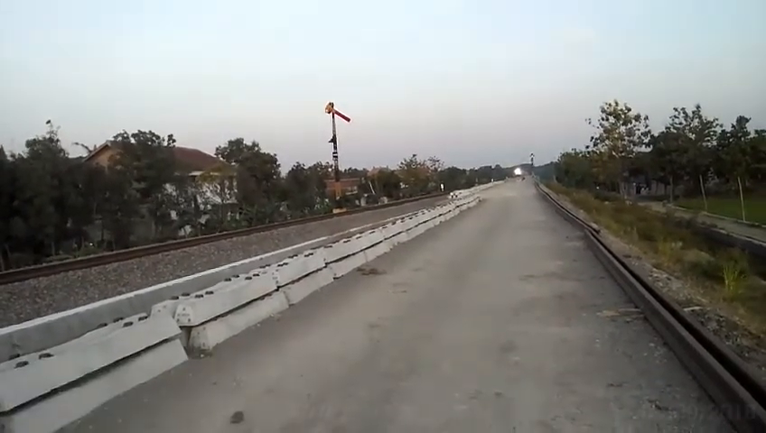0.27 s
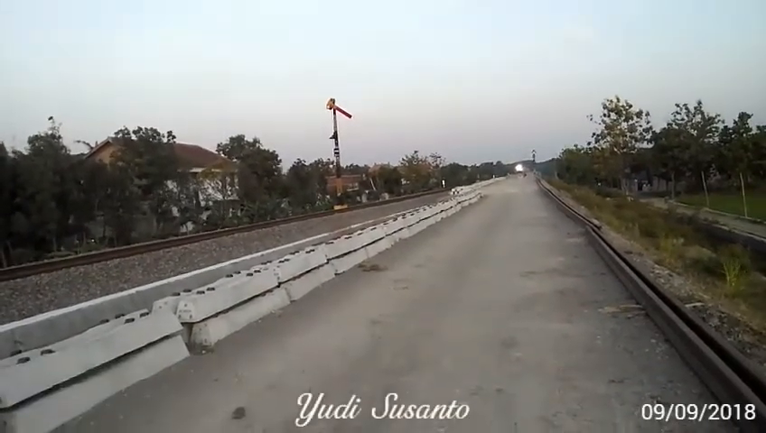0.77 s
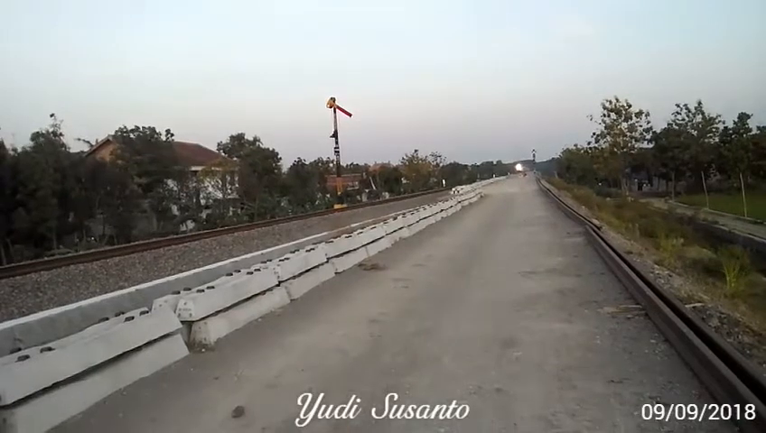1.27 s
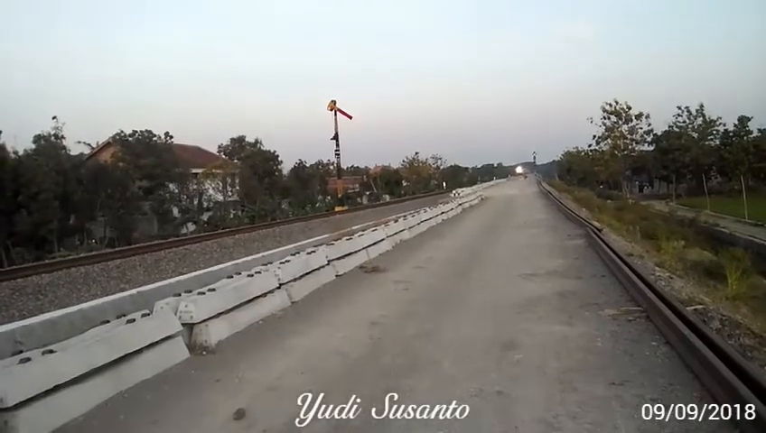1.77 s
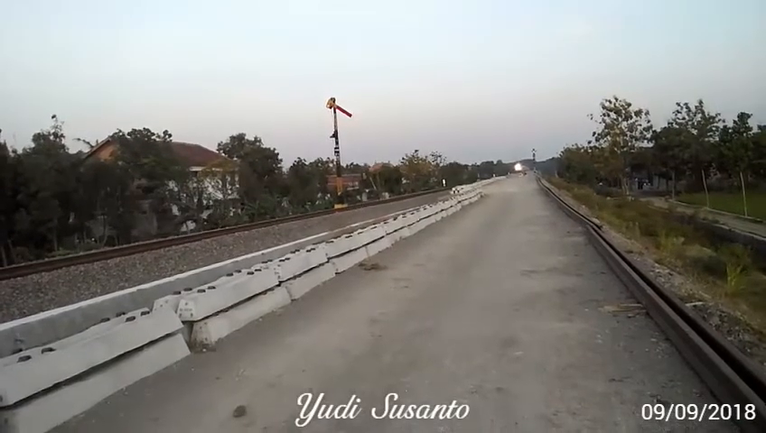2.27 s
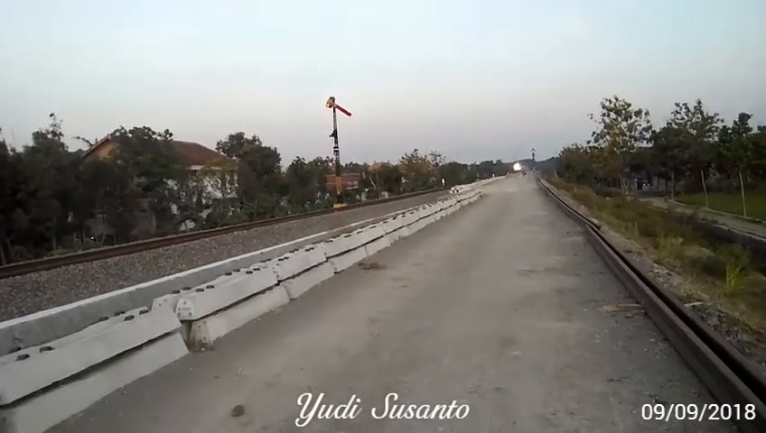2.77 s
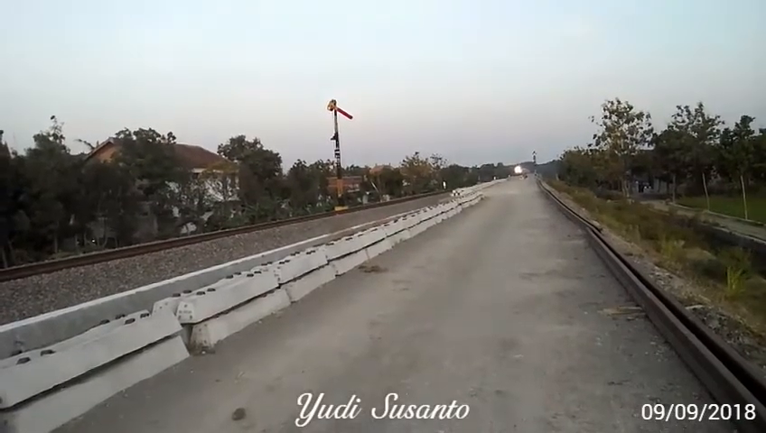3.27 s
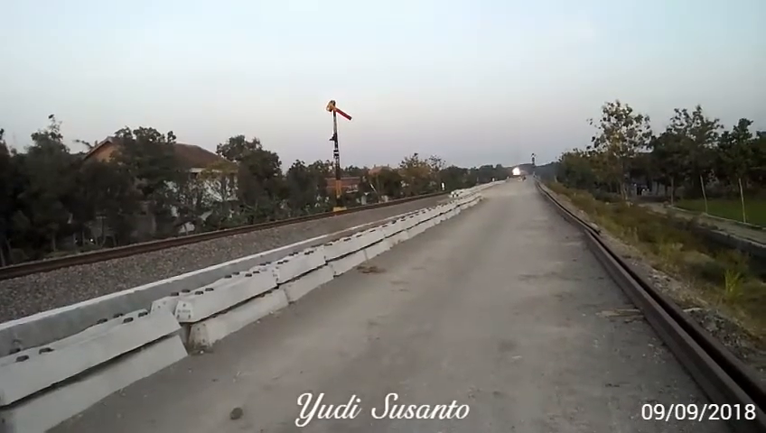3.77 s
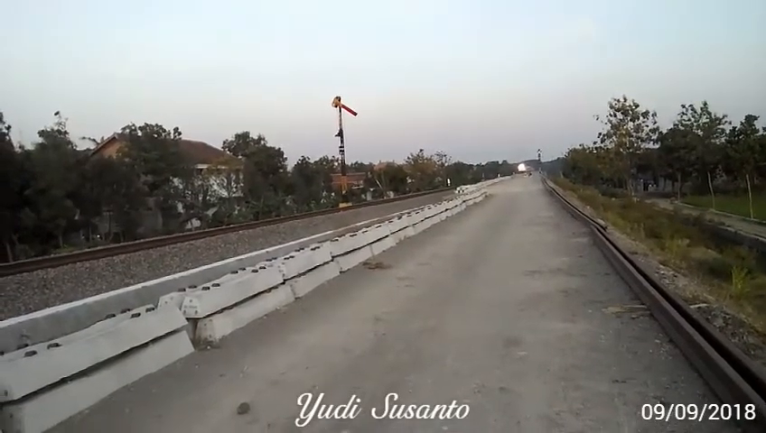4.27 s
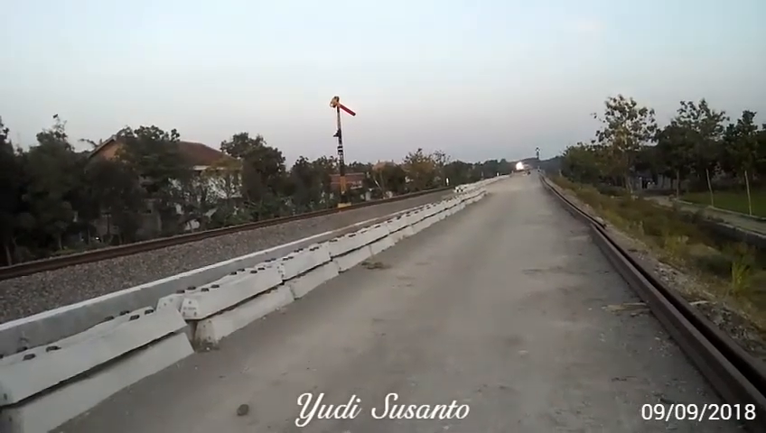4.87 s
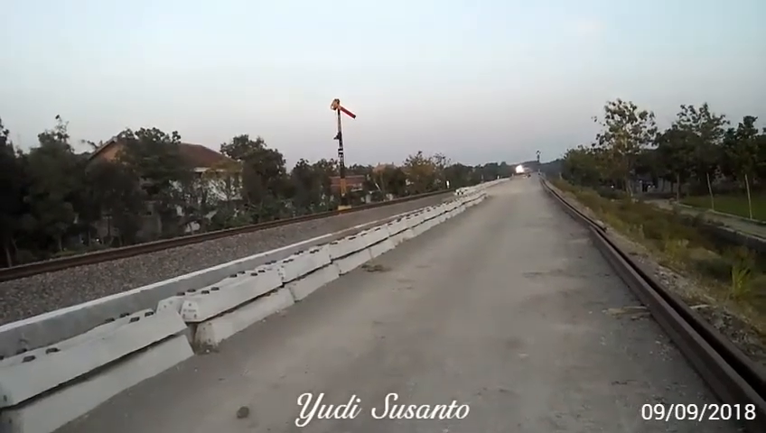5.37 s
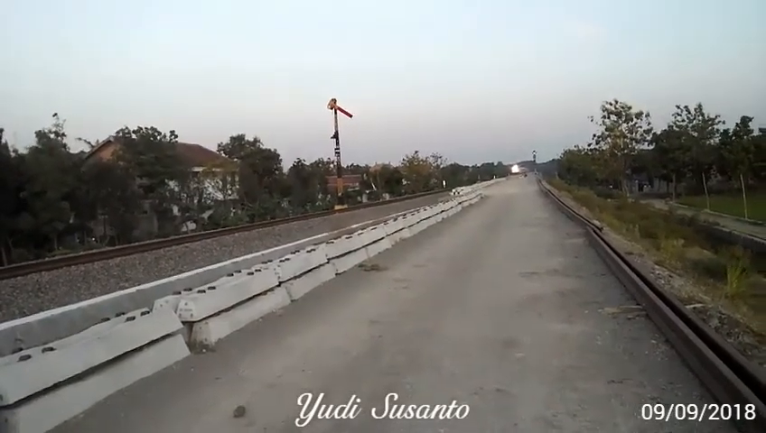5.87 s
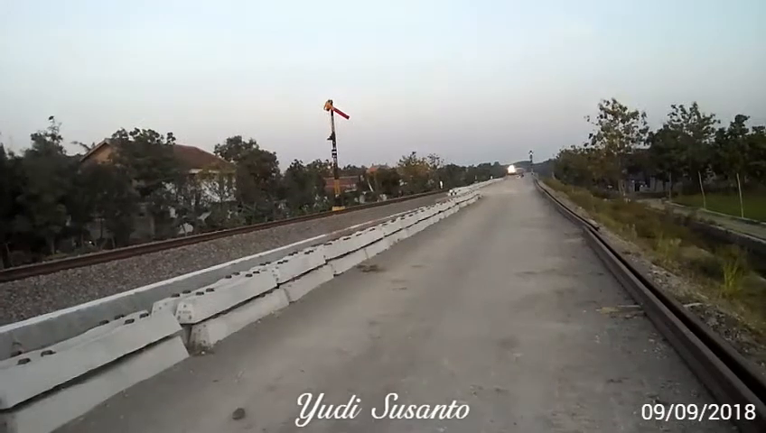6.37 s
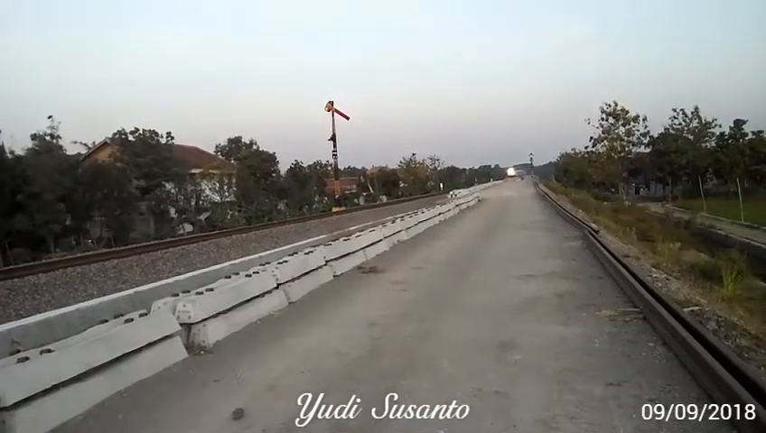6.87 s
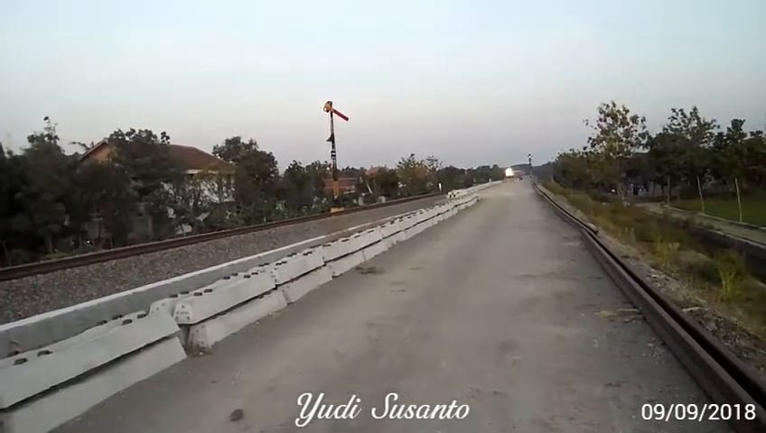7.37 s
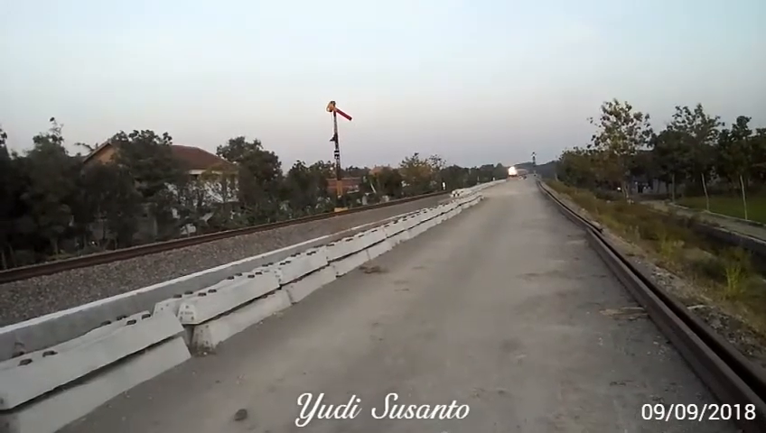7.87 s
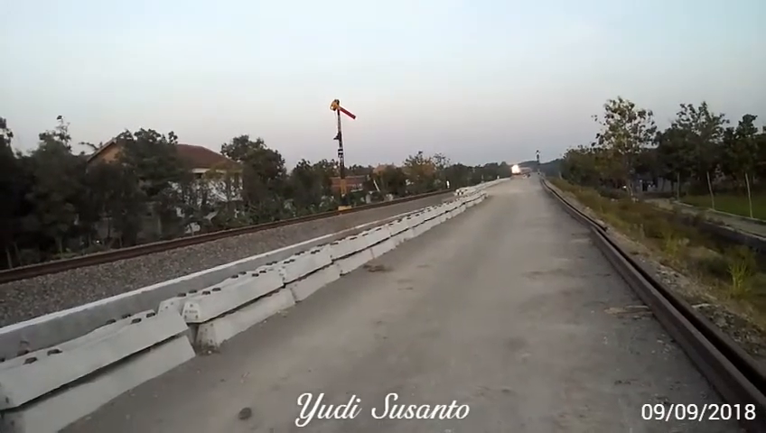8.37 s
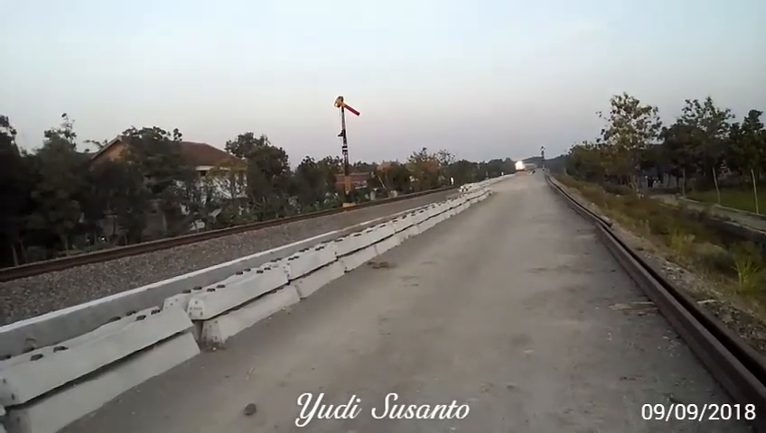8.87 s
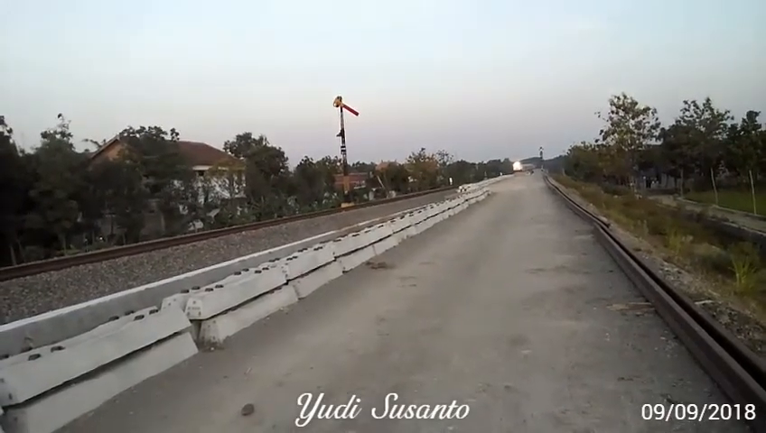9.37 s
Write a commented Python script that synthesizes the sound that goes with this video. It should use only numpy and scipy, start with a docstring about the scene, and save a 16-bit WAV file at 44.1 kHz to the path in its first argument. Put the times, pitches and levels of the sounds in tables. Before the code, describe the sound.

Mono outdoor sound beside a railway line, about 9.6 seconds. Throughout, a distant diesel locomotive gives a low, rough, wavering drone with a rapid throb, under a dull roar, soft rushing and very faint hiss that drift with the air. At first the wind is light, with small bumps from 0.2 to 1.2 s. From 1.6 to 3 s gusts hit the microphone in close, muffled fluttering thumps; at about 2.6 s a tiny dry triple-contact tick sounds nearby. It calms around 3 to 4.3 s, leaving the drone exposed. Thumps return at 4.3-4.9 s, then a denser, stronger run from 5.5 to 7.4 s, hardest near 6.7 s, with a very brief dip in the airy rushing around 7.15 s. Scattered weaker bumps follow near 8, 8.5 and 9 s. The engine grows slightly brighter towards the end, the rushing a little clearer, but it stays far away.

```python
"""Gusts of wind buffet a small microphone in open country beside a railway line; far down the track
a diesel locomotive drones, throbs and brightens as it approaches, and once something ticks close by.
The wind is shaped noise that swells in gusts, with short pressure swings for single eddies.
The locomotive is a set of crankshaft harmonics plus noise modulated four times a turn.
A dull roar, a rushing and a faint hiss are noise bands that swell and flicker; the tick is three bursts."""
import sys
import numpy as np
from scipy import signal
from scipy.fft import rfft, irfft, next_fast_len
from scipy.io import wavfile
from scipy.ndimage import map_coordinates

SR = 44100
rng = np.random.default_rng(int(sys.argv[2]) if len(sys.argv) > 2 else 0)


def dump_mix(stems):
    """Bounce the given channels to the path in sys.argv[1] as a 16-bit WAV at rate SR."""
    frames = np.atleast_2d(stems).T  # one column per channel
    limited = np.clip(frames, -1, 1)  # hard clip at full scale
    pcm = np.round(limited * 32767).astype(np.int16)
    wavfile.write(sys.argv[1], SR, pcm)


N = 424683  # length in samples

# Spectrum shape of wind noise at the microphone: [frequency_hz, relative_density_db]
WIND_SPECTRUM = [(20, -37.5), (35, -29.5), (65, -16), (110, -6.5), (180, -0.5), (310, 1.5), (440, -1.5),
                 (600, -6), (850, -15.5), (1200, -30.5), (1800, -45.5), (3000, -66)]
# Gusts as short puffs: [crest_s, relative_turbulence_db, half_length_s, rumble_db]
GUST_PUFFS = [(0.494, -41.5, 0.017, -36), (0.551, -40, .014, -41), (0.663, -41.5, 0.015, -35),
              (0.752, -45, .03, -38), (0.968, -42.5, .03, -45.5), (1.092, -45.5, .018, -40.5),
              (1.622, -37.5, .014, -38), (1.773, -34.5, .026, -39.5), (1.849, -34, .024, -38.5),
              (2.029, -34, .013, -37), (2.077, -35.5, .015, -36), (2.16, -36.5, 0.035, -36),
              (2.292, -38, .019, -39), (2.537, -38.5, .022, -46), (2.706, -39, 0.0099, -45),
              (2.881, -42, .032, -40), (3.069, -45.5, .025, -52), (4.342, -36.5, .014, -37.5),
              (4.387, -35.5, .018, -39), (4.486, -37, .017, -36), (4.706, -36, 0.019, -39),
              (4.75, -34, .02, -41), (4.866, -43, .035, -43.5), (5.557, -38.5, .016, -41),
              (5.635, -36.5, .02, -47), (5.72, -37, .024, -42), (5.808, -34.5, .03, -36),
              (5.902, -37, 0.031, -52), (5.983, -37, .017, -46), (6.067, -34, .029, -36.5),
              (6.217, -38, .028, -40.5), (6.35, -42.5, 0.074, -49), (6.489, -39, 0.02, -41),
              (6.585, -41, 0.016, -46), (6.658, -33, .009, -41), (6.74, -30, .02, -34),
              (6.821, -36.5, 0.033, -42.5), (6.91, -38, 0.023, -47.5), (7.027, -37, .04, -40),
              (7.351, -35.5, .017, -36), (7.439, -40.5, .02, -45), (7.964, -40, .033, -40),
              (8.135, -41, 0.037, -39), (8.468, -41, .038, -36.5), (8.597, -44.5, .03, -45),
              (9.031, -42.5, 0.016, -48.5)]
GUST_FALL_RATIO = 1.3  # a gust dies away this much more slowly than it builds
EDDY_HZ = 378  # pitch of a typical thump


def from_db(db):
    """Decibels to amplitude gain: 20 dB is a factor of ten."""
    return 10 ** (np.asarray(db) / 20)


def rms_one(x):
    """Normalisation to unit root-mean-square amplitude."""
    return x / np.sqrt(np.mean(x ** 2) + 1e-20)


def in_time(rows):
    """Linear interpolation of each column of a curve, at every sample."""
    s, *columns = np.transpose(rows)
    return [np.interp(np.arange(N) / SR, s, column) for column in columns]


def drift(rate_hz):
    """Low-passed noise of unit spread: a random change about rate_hz times a second."""
    step = 40  # samples between computed values
    warm_up = 2000
    pole = np.exp(-2 * np.pi * rate_hz * step / SR)
    noise = rng.standard_normal(N // step + warm_up + 2)
    slow = signal.lfilter([1], [1, -2 * pole, pole * pole], noise)[warm_up:]
    return np.interp(np.arange(N) / step, np.arange(len(slow)), rms_one(slow))


def coloured(spectrum):
    """Spectral shaping: steady white noise weighted in frequency, rms 1."""
    hz, db = np.transpose(spectrum)
    size = next_fast_len(N)
    log_hz = np.log(np.arange(size // 2 + 1) * SR / size + 1)
    above = np.maximum(log_hz - np.log(hz[-1]), 0)
    below = np.maximum(np.log(hz[0]) - log_hz, 0)
    # outside the listed range the spectrum falls steadily, more steeply on the treble side
    gain = from_db(np.interp(log_hz, np.log(hz), db) - 50 * (above + below / 2))
    return rms_one(irfft(rfft(rng.standard_normal(size)) * gain, size)[:N])


def split(x, hz):
    """Complementary zero-phase crossover: the parts below and above hz sum to the whole."""
    low = signal.sosfiltfilt(signal.butter(2, hz, fs=SR, output="sos"), x)
    return low, x - low


def hump(s, half_length_s, fall_ratio=1):
    """Gaussian envelope of height 1 with its crest at s; half_length_s is its standard deviation."""
    age = np.arange(N) / SR - s
    length = np.where(age < 0, half_length_s, half_length_s * fall_ratio)
    return np.exp(-np.minimum((age / length) ** 2 / 2, 20))


def through_air(x, depth_db, patch_hz, rate, size=1024):
    """Selective fading: shifting air paths make narrow patches of the spectrum swell and fade; rms 1."""
    hz, s, parts = signal.stft(x, SR, nperseg=size)
    chance = rng.standard_normal((800, 200))
    places = np.meshgrid(hz / patch_hz, s * rate, indexing="ij")
    fading = map_coordinates(chance, places, mode="mirror")
    faded = signal.istft(parts * from_db(depth_db * fading), SR, nperseg=size)[1]
    return rms_one(faded[:N])


def wind_strength():
    """Power addition of incoherent flows: gusts over the breeze, as relative dB at every sample."""
    # steady breeze between gusts: [time_s, relative_turbulence_db]
    breeze = [(0, -55.5), (1.4, -55), (2.5, -47.5), (4.2, -51), (5.3, -45.5), (6.3, -43.5), (7.7, -47),
              (8.5, -47), (9.63, -53.5)]
    breeze_db, = in_time(breeze)
    power = from_db(breeze_db) ** 2
    for s, db, length, _ in GUST_PUFFS:
        power += (from_db(db) * hump(s, length, GUST_FALL_RATIO)) ** 2
    return 10 * np.log10(power)


def rumble_level(calm_db=-48.5, stretch=1.5):
    """Large eddies decay slowly: the bass of each gust outlasts its flutter; gain at every sample."""
    power = from_db(calm_db) ** 2
    for s, _, length, db in GUST_PUFFS:
        power = power + (from_db(db) * hump(s, length * stretch, GUST_FALL_RATIO)) ** 2
    return np.sqrt(power)


def turbulence(wind_db, split_hz=150, edge_hz=560, lumps_db=3.0, lump_rate=50, edge_lumps_db=4.0,
               brighten=0.16, body_db=4.5, edge_db=-2.0, bass_lumps_db=2.5, bass_lump_rate=8):
    """Turbulent pressure noise: harder lumps of air reach higher in pitch, over a heaving rumble."""
    swing_db = wind_db - np.mean(wind_db)
    bass, rest = split(coloured(WIND_SPECTRUM), split_hz)
    body, edge = split(rest, edge_hz)
    lumps = 2 * np.tanh(drift(lump_rate) / 2)  # bounded, so no lump runs away
    edge = edge * from_db(edge_db + brighten * swing_db + edge_lumps_db * lumps)
    flutter = from_db(wind_db + body_db + lumps_db * lumps) * (body + edge)
    heave = from_db(bass_lumps_db * drift(bass_lump_rate))
    return flutter + rumble_level() * heave * rms_one(bass)


def hum(crank, order=17, beat_hz=6.3, partner_db=-8.5, waver_db=0.7):
    """Beating: a line at a multiple of the crank rate, with a weaker one just above it; rms 1."""
    angle = order * crank
    partner = np.cos(angle + 2 * np.pi * beat_hz * np.arange(N) / SR)
    pair = np.cos(angle) + from_db(partner_db) * partner
    return rms_one(pair * from_db(waver_db * drift(0.82)))


def locomotive(lines_db=-1.0, chuff_db=-1.5, waver=0.3, wander=0.0015, throb=0.39, pivot_hz=260):
    """Periodic exhaust gives crank harmonics that waver in moving air; rough noise throbs four times a turn."""
    # course of the engine: [time_s, crank_turns_per_s, relative_drone_db, brightness_db_per_octave, hum_db]
    engine_course = [(0, 9.3, -36, -1.5, -48.5), (1.2, 9.13, -38.5, -1.5, -47.5),
                     (2.5, 9.14, -37.5, -5, -39.5), (3.7, 8.83, -36, -3.5, -42.5),
                     (5.2, 9, -35.5, 0.5, -45), (7.5, 9.24, -34.5, 4.5, -52), (8.5, 9.3, -36.5, 3, -46.5),
                     (9.63, 9.8, -36.5, 7.5, -54)]
    # exhaust harmonics: [multiple_of_crank_rate, relative_level_db]
    exhaust_lines = [(12, -14.5), (15, -9.5), (18, -7.5), (20, -5.5), (21, -11), (23, -10.5), (24, -4.5),
                     (25, -4), (26, -2), (27, -6.5), (28, -2.5), (29, 0.5), (30, 1), (31, -1), (34, -6.5),
                     (35, -6), (36, 0.5), (37, -9.5), (38, -5.5), (39, -10), (40, -7), (41, -11.5),
                     (43, -8.5), (44, -13.5)]
    # spectrum shape of the rough exhaust noise: [frequency_hz, relative_density_db]
    chuff_spectrum = [(25, -36.5), (60, -19.5), (110, -11.5), (170, -5.5), (260, 0), (300, -2), (350, -3.5),
                      (450, -7.5), (560, -22), (900, -33.5)]
    speed, drone_db, bright_db, hum_db = in_time(engine_course)
    crank = 2 * np.pi * np.cumsum(speed * (1 + wander * drift(1.99))) / SR
    lines = np.zeros(N)
    phases = rng.uniform(0, 2 * np.pi, len(exhaust_lines))
    for (order, db), phase in zip(exhaust_lines, phases):
        angle = round(order) * crank + phase
        gain = from_db(db + bright_db * np.log2(order * speed / pivot_hz))
        in_phase = (1 + waver * drift(2.4)) * np.cos(angle)
        quadrature = waver * drift(0.9) * np.sin(angle)
        lines += gain * (in_phase + quadrature)
    rough = through_air(coloured(chuff_spectrum), depth_db=3.0, patch_hz=40, rate=5.0)
    low, high = split(rough, pivot_hz)
    tilted = low * from_db(-bright_db / 2) + high * from_db(bright_db / 2)
    chuff = tilted * (1 + throb * np.cos(4 * crank))
    drone = from_db(lines_db) * rms_one(lines) + from_db(chuff_db) * rms_one(chuff)
    return from_db(drone_db) * drone + from_db(hum_db) * hum(crank)


def distance(roar_db=1.5, rush_db=-1.97, hiss_db=-4.5, flicker_db=1.5, hiss_flicker_db=1.0,
             top_hz=2700, top_follows=.35):
    """Propagation through moving air: roar, rushing and hiss swell; the rushing's top leans towards the hiss."""
    # levels of the far sound: [time_s, relative_roar_db, relative_rushing_db, relative_hiss_db]
    far_levels = [(0, -49.5, -60.5, -89), (.8, -50, -60, -91), (2.25, -47, -60.5, -88.5),
                  (2.37, -44.5, -54, -81.5), (2.53, -46, -59.5, -86), (2.95, -46, -55, -85.5),
                  (3.35, -46.5, -57.5, -84.5), (4.45, -46.5, -60, -86.5), (4.9, -46.5, -55, -79.5),
                  (5.2, -46, -56.5, -83.5), (5.68, -42.5, -55, -79), (5.9, -43, -55.5, -83),
                  (6.6, -46, -56, -84), (7.65, -47.5, -57, -83), (8.2, -45.5, -54.5, -84.5),
                  (8.88, -49.5, -53, -82.5), (9.05, -51.5, -50, -84.5), (9.63, -45.5, -52.5, -80)]
    # gain of rushing and hiss, with an abrupt dip and recovery: [time_s, gain_db]
    dip_curve = [(7.143, 7.5), (7.152, -2), (7.225, -2), (7.26, 1), (7.33, 5)]
    # spectrum shape of the dull roar: [frequency_hz, relative_density_db]
    roar_spectrum = [(300, -9), (550, -2), (700, 2.5), (830, 3), (960, -1.5), (1100, -6.5), (1400, -14.5),
                     (1800, -28.5)]
    # spectrum shape of the rushing: [frequency_hz, relative_density_db]
    rush_spectrum = [(1100, -4), (1440, -9.5), (1670, 1.5), (1900, -1.5), (2170, -5), (2480, -4.5),
                     (2850, -15.5), (3250, -23), (3550, -27), (4000, -35.5), (4900, -50)]
    # spectrum shape of the faint hiss: [frequency_hz, relative_density_db]
    hiss_spectrum = [(4900, -19), (5800, -4.5), (7200, 3.5), (7900, -8.5), (8900, -12.5), (10000, -27)]
    roar_level, rush_level, hiss_level = in_time(far_levels)
    dip_db, = in_time(dip_curve)
    roar = through_air(coloured(roar_spectrum), depth_db=3.2, patch_hz=45, rate=3.5)
    rush = through_air(coloured(rush_spectrum), depth_db=2.4, patch_hz=80, rate=10.0)
    hiss = through_air(coloured(hiss_spectrum), depth_db=2.0, patch_hz=200, rate=20.0)
    body, top = split(rush, top_hz)
    bright_db = hiss_level - rush_level
    rush = body + top * from_db(top_follows * (bright_db - np.mean(bright_db)))
    air = from_db(rush_level + rush_db) * rush
    air += from_db(hiss_level + hiss_db + hiss_flicker_db * drift(50)) * hiss
    return from_db(roar_level + roar_db) * roar + air * from_db(dip_db + flicker_db * drift(63))


def small_eddies(wind_db, count=240, rate_per_s=9, over_wind_db=14.5, spread_db=2.5, top_db=-24.5,
                 pitch_spread_octaves=0.49):
    """Random thinning: lesser eddies, more frequent and harder in gusts: [time_s, relative_peak_db, pitch_hz]."""
    when, luck = rng.random((count, 2)).T
    strength, pitch = rng.standard_normal((count, 2)).T
    local_db = wind_db[(when * N).astype(int)]
    chance = rate_per_s * N / SR / count * from_db((local_db - np.mean(wind_db)) / 2)
    peak_db = np.minimum(local_db + over_wind_db + spread_db * strength, top_db)
    rows = np.transpose([when * N / SR, peak_db, EDDY_HZ * 2 ** (pitch_spread_octaves * pitch)])
    return list(rows[luck < chance])


def buffets(wind_db, level_db=-2.0, cycles=0.38, crack_hz=900, crack_s=.00044, crack_db=-20.5,
            crack_db_per_octave=17, crack_follows=0.15, wake_db=-13.0, wake_s=0.012, lead_s=0.005,
            boom_db=-23.0, boom_s=0.019, boom_hz=210, low_cut_hz=85, edge_hz=480, edge_db_per_octave=6.0):
    """Eddy impact: a quick pressure swing with a flank, in a churn brighter for quick eddies, longest in bass."""
    # hardest eddies to hit the port: [time_s, relative_peak_db, pitch_hz]
    hard_eddies = [(.182, -21, 240), (.504, -23, 230), (.561, -21, 420), (.641, -16, 300),
                   (.672, -17.5, 400), (.676, -19, 250), (.965, -19, 300), (1.002, -20.5, 280),
                   (1.195, -21.5, 240), (1.599, -15.5, 625), (1.604, -15, 450), (1.611, -13, 350),
                   (1.615, -18.5, 430), (1.623, -29, 480), (1.633, -21, 300), (1.754, -10, 410),
                   (1.778, -7.5, 367), (1.786, -18.5, 520), (1.81, -15.5, 270), (1.85, -17.5, 395),
                   (1.874, -22, 276), (1.978, -12.5, 360), (2.019, -15, 270), (2.029, -10.5, 393),
                   (2.035, -17, 420), (2.047, -15, 340), (2.076, -8.5, 412), (2.089, -18.5, 324),
                   (2.16, -16.5, 260), (2.172, -14.5, 433), (2.279, -13, 400), (2.292, -18, 350),
                   (2.308, -15, 348), (2.465, -16, 560), (2.524, -12.5, 420), (2.58, -17, 342),
                   (2.703, -9.5, 390), (2.748, -18, 257), (2.89, -10, 419), (2.932, -17, 460),
                   (2.978, -14.5, 500), (3.284, -25.5, 290), (3.398, -23, 260), (3.473, -19, 370),
                   (4.335, -11, 300), (4.34, -10.5, 521), (4.353, -14, 263), (4.366, -22, 520),
                   (4.39, -14.5, 310), (4.487, -9, 390), (4.497, -13.5, 248), (4.515, -27, 400),
                   (4.574, -20.5, 330), (4.603, -19, 280), (4.691, -11.5, 298.6), (4.711, -15, 380),
                   (4.744, -13.5, 330), (4.773, -15.5, 400), (4.888, -20, 380), (5.553, -11.5, 424),
                   (5.592, -18, 390), (5.646, -13.5, 352), (5.707, -13.5, 289.2), (5.802, -9.5, 400),
                   (5.822, -16, 334), (5.833, -20, 330), (5.849, -18, 320), (5.931, -17, 297),
                   (5.99, -16, 383.3), (6.048, -15.5, 293), (6.065, -9.5, 510), (6.082, -12.5, 305),
                   (6.094, -11, 234), (6.153, -14, 281.7), (6.199, -12.5, 480), (6.229, -12, 312.6),
                   (6.443, -15, 252), (6.487, -20, 366.8), (6.497, -17, 270), (6.664, -13.5, 310),
                   (6.672, -10.5, 405.4), (6.717, -11, 290), (6.723, -15.5, 480), (6.727, -7.5, 350),
                   (6.738, -10, 362), (6.761, -12, 480), (6.775, -15, 304), (6.806, -18, 398),
                   (6.999, -17, 290.6), (7.035, -16.5, 460), (7.06, -19, 393), (7.167, -18.5, 482.4),
                   (7.197, -12.5, 610), (7.2, -19, 330), (7.209, -20, 370), (7.337, -19, 430),
                   (7.349, -13.5, 349.8), (7.357, -19.5, 480), (7.439, -16.5, 277.2), (7.877, -16, 336),
                   (7.956, -15.5, 449.8), (7.993, -18, 362.5), (8.442, -24, 400), (8.459, -17.5, 460),
                   (8.52, -21, 323), (9.017, -17, 336), (9.03, -18.5, 353), (9.077, -12, 460)]
    eddies = hard_eddies + small_eddies(wind_db)
    t = np.arange(N) / SR
    thumps, wake, spray, boom = np.zeros((4, N))
    body, edge = split(coloured(WIND_SPECTRUM), edge_hz)
    bass, _ = split(coloured(WIND_SPECTRUM), boom_hz)
    for (s, db, hz), phase in zip(eddies, rng.uniform(0, 2 * np.pi, len(eddies))):
        near = slice(max(int((s - .15) * SR), 0), int((s + .15) * SR))
        age, octaves, peak = t[near] - s, np.log2(hz / EDDY_HZ), from_db(db)
        swing = np.cos(2 * np.pi * hz * age + phase) / np.cosh(age * hz / cycles)
        flank_hz = crack_hz * (hz / EDDY_HZ) ** crack_follows
        flank = np.cos(2 * np.pi * flank_hz * age + phase) / np.cosh(age / crack_s)
        # a quicker eddy has a steeper flank
        thumps[near] += peak * (swing + from_db(crack_db + crack_db_per_octave * octaves) * flank)
        # overlapping wakes add in power
        churn = peak * np.exp(-np.maximum(age / wake_s, -age / lead_s))
        wake[near] = np.hypot(wake[near], churn)
        spray[near] = np.hypot(spray[near], churn * from_db(edge_db_per_octave * octaves))
        slow_churn = peak * np.exp(-np.maximum(age / boom_s, -age / lead_s / 2))
        boom[near] = np.hypot(boom[near], slow_churn)
    out = from_db(level_db) * split(thumps, low_cut_hz)[1]
    out += from_db(wake_db) * (wake * body + spray * edge)
    return out + from_db(boom_db) * boom * rms_one(bass)


def swells(edge=1.6, sag_hz_per_s=110):
    """Narrow-band noise on a gliding carrier: the far sound briefly rings in a band that sinks in pitch."""
    # ringing bands: [crest_s, centre_hz, width_hz, crest_rms_db, half_length_s]
    ringing_bands = [(1.102, 949, 70, -53, .3), (1.55, 1890, 200, -55, 0.047), (2.393, 2570, 600, -58, .04),
                     (2.972, 1810, 222, -53, 0.088), (3.0, 1600, 90.4, -64, .08),
                     (3.198, 781, 219, -47, 0.19), (5.03, 1610, 110, -58, 0.09),
                     (5.148, 880, 200, -51.5, 0.29), (5.7, 1810, 129, -55.5, 0.07),
                     (5.866, 2610, 113, -57, 0.024), (6.617, 1705, 30.06, -54, 0.052),
                     (7.45, 1660, 69.3, -57, 0.13), (9.075, 1760, 219, -50.5, .11),
                     (9.154, 880, 172, -52, .35), (9.502, 2380, 250, -55, 0.069)]
    t, out, size = np.arange(N) / SR, np.zeros(N), next_fast_len(N)
    grid = np.fft.fftfreq(size, 1 / SR)
    for s, hz, width_hz, db, length in ringing_bands:
        shape = 1 / (1 + (2 * grid / width_hz) ** 2) ** edge
        band = np.fft.ifft(np.exp(2j * np.pi * rng.random(size)) * shape)[:N]
        phase = 2 * np.pi * (hz * t - sag_hz_per_s * (t - s) ** 2 / 2)
        ringing = rms_one(np.real(band * np.exp(1j * phase)))
        out += from_db(db) * ringing * hump(s, length)
    return out


def tick(rise_s=0.0009, split_hz=5000):
    """Impulsive contact: three tiny dry noise bursts in quick succession, the first the thinnest."""
    # contacts: [time_s, level_db, decay_s, extra_treble_db]
    contacts = [(2.604, -54, 0.0016, 15), (2.6117, -35, 0.0016, -3), (2.618, -43.5, 0.0045, 0)]
    # spectrum shape of a contact: [frequency_hz, relative_density_db]
    contact_spectrum = [(1000, 2), (2500, 12.5), (3700, 5), (4400, -14), (4950, -34), (5500, -7),
                        (6000, -13), (7400, -2), (9400, -11.5), (10800, -25)]
    t, out = np.arange(N) / SR, np.zeros(N)
    body, treble = split(coloured(contact_spectrum), split_hz)
    for s, db, decay, treble_db in contacts:
        shape = np.exp(-np.minimum(np.maximum((t - s) / decay, (s - t) / rise_s), 20))
        out += from_db(db) * shape * (body + from_db(treble_db) * treble)
    return out


def scene():
    """Superposition: wind at the microphone over the far sounds of the line and the tick."""
    wind_db = wind_strength()
    surroundings = locomotive() + distance() + swells() + tick()
    return (surroundings + turbulence(wind_db) + buffets(wind_db))[None]


def record(dry):
    """Band limiting: short fades at both ends, then a steep low-pass, 70 dB down from 11.5 kHz up."""
    ends = signal.windows.tukey(N, .012 * SR / N)  # 6 ms fade at each end
    low_pass = signal.cheby2(12, 70, 11500, fs=SR, output="sos")
    return signal.sosfilt(low_pass, dry * ends)


dry = scene()
out = record(dry)
dump_mix(out)
```